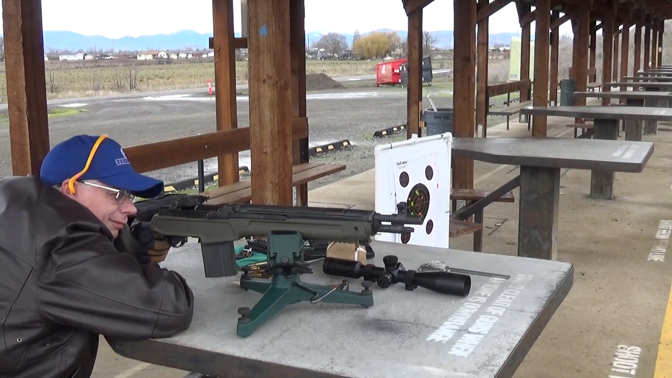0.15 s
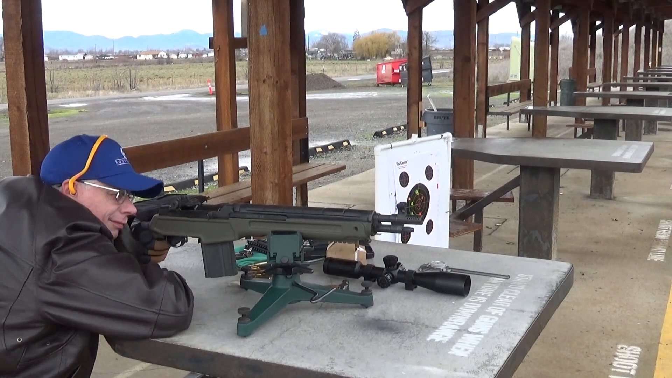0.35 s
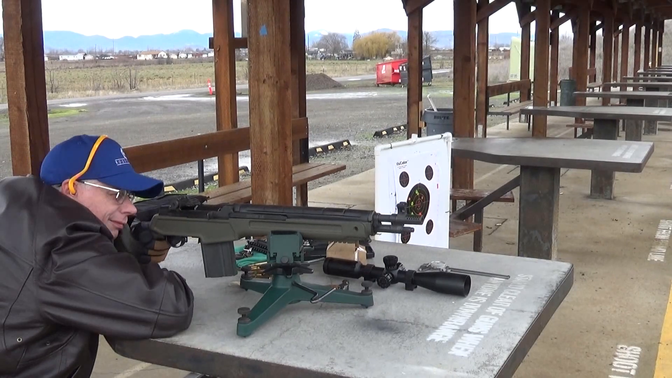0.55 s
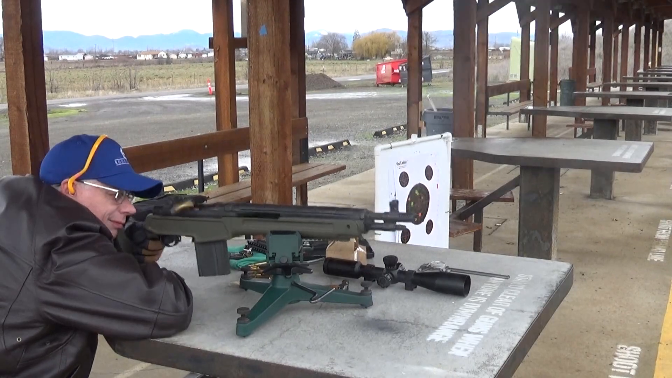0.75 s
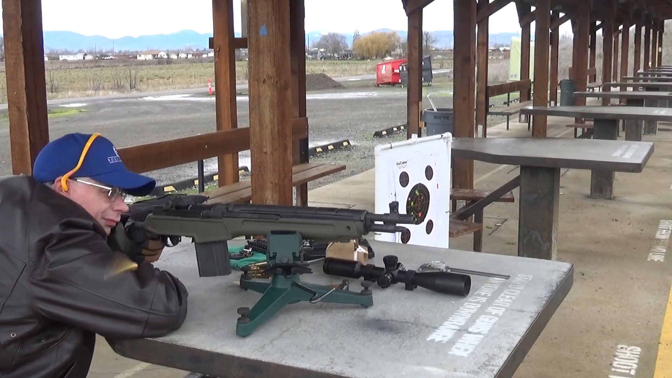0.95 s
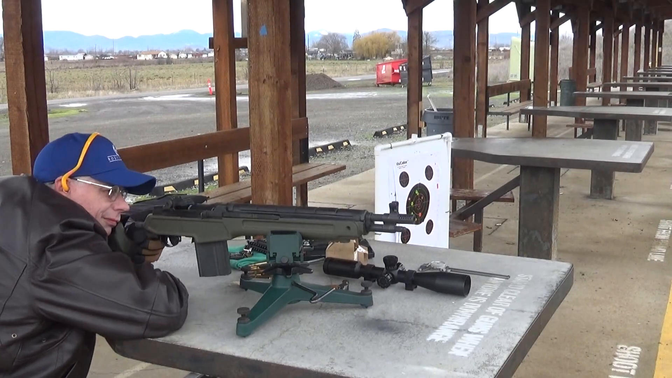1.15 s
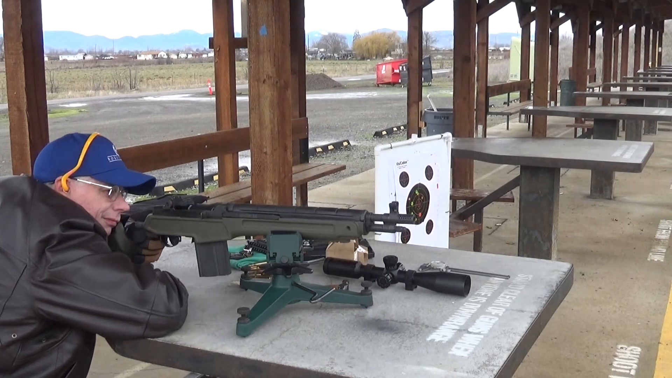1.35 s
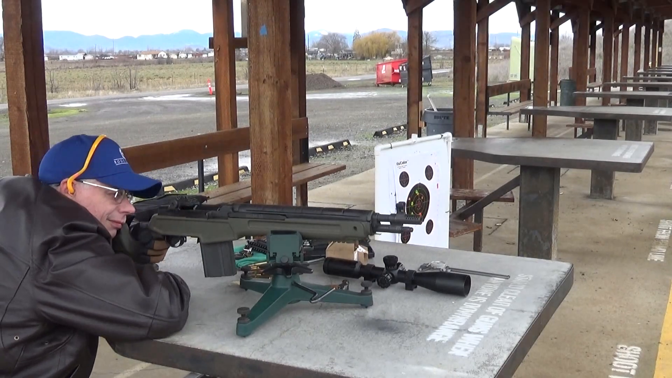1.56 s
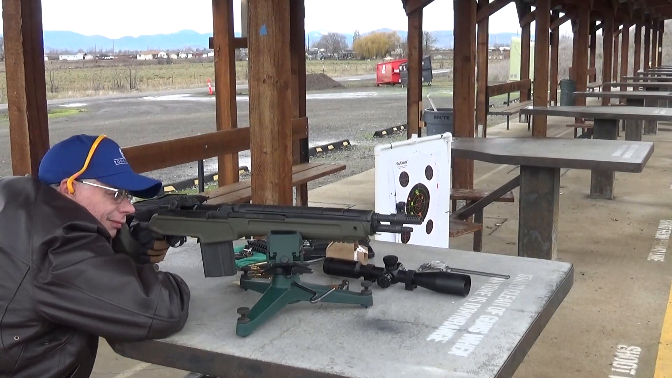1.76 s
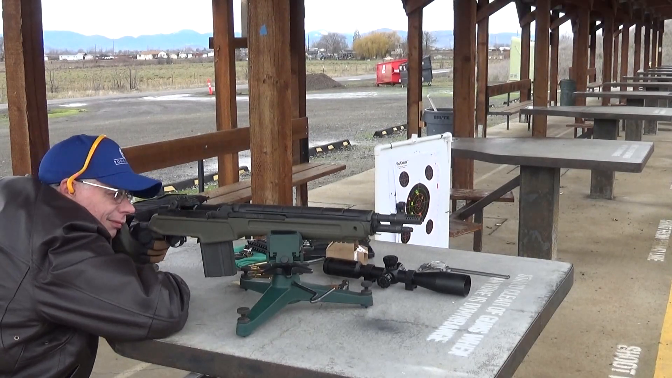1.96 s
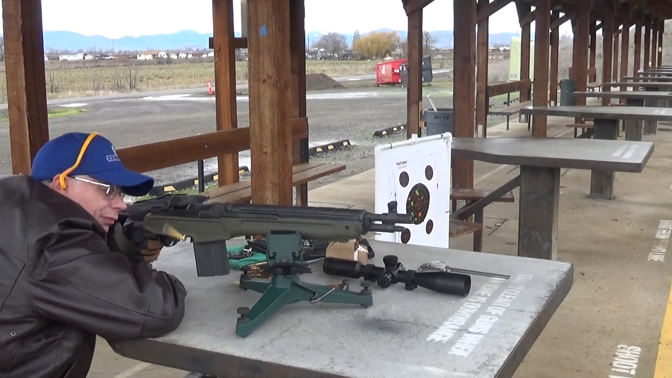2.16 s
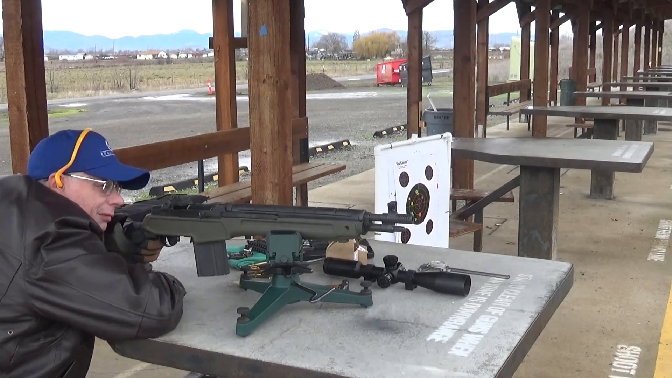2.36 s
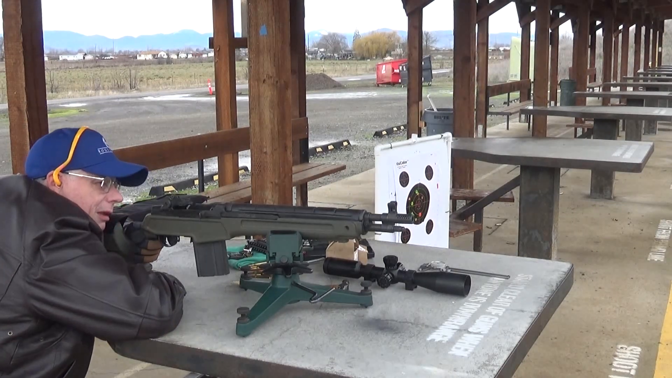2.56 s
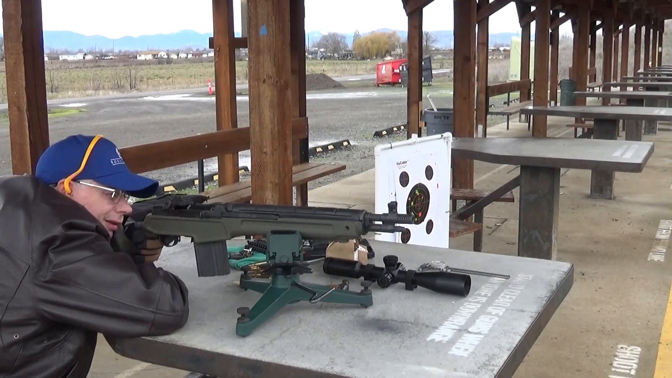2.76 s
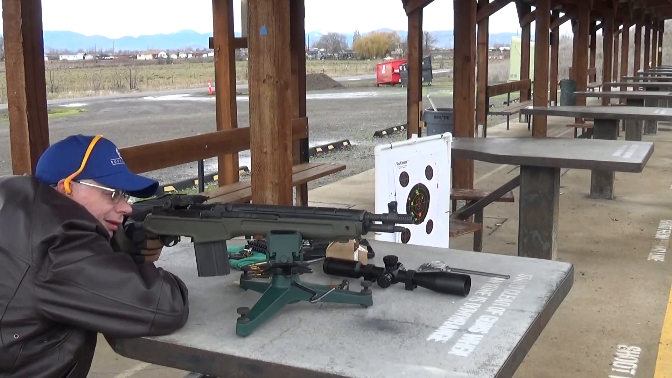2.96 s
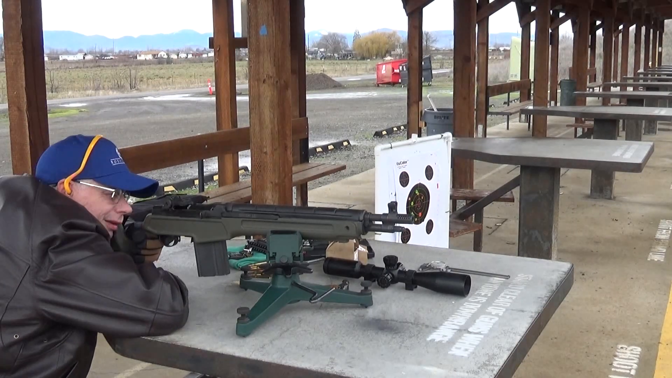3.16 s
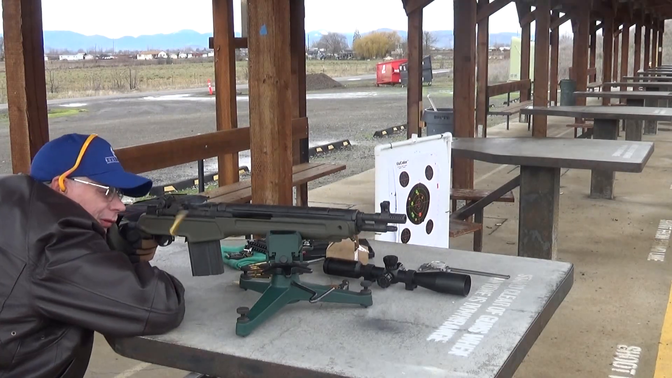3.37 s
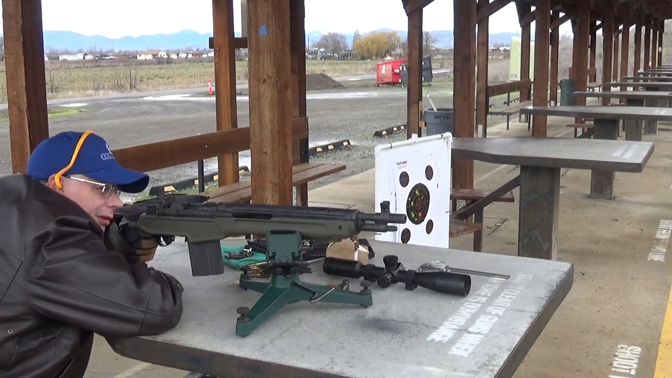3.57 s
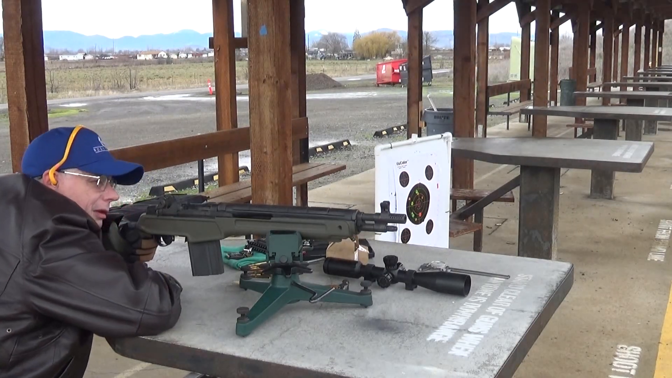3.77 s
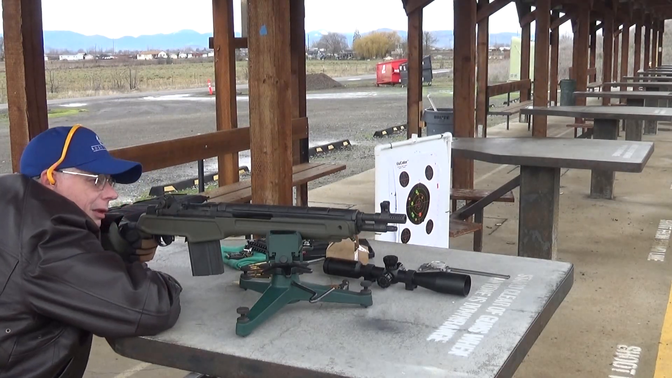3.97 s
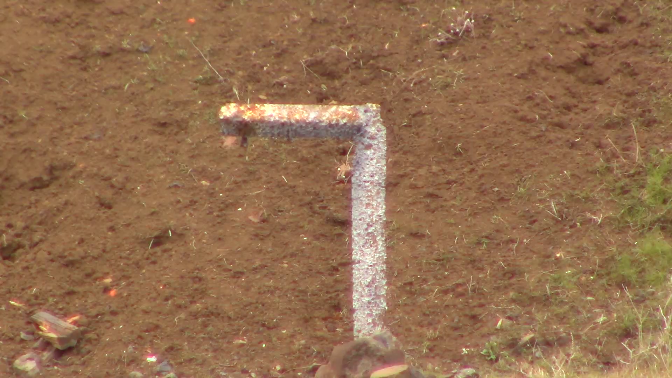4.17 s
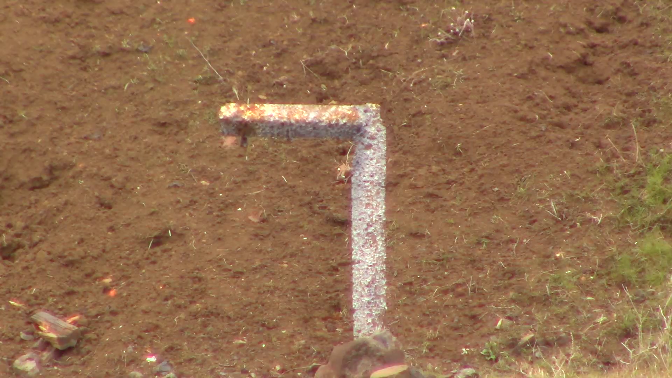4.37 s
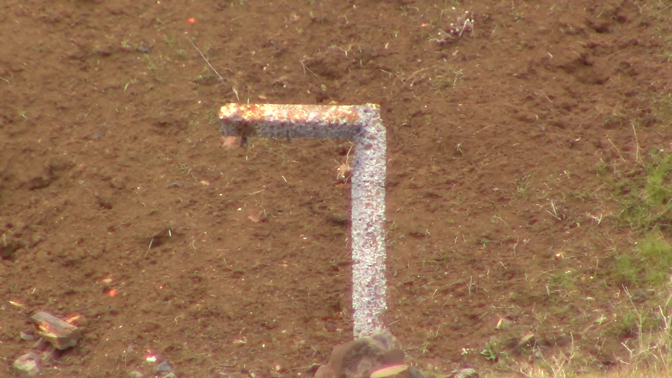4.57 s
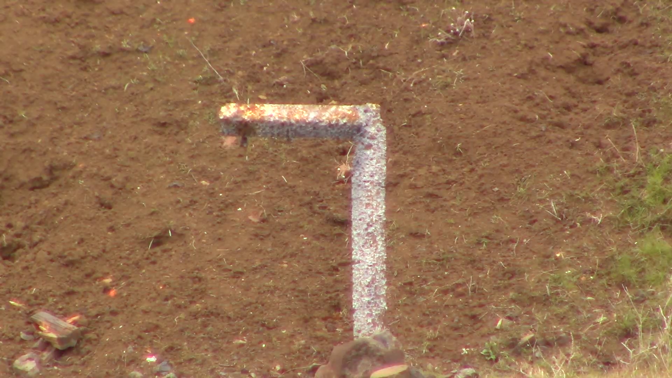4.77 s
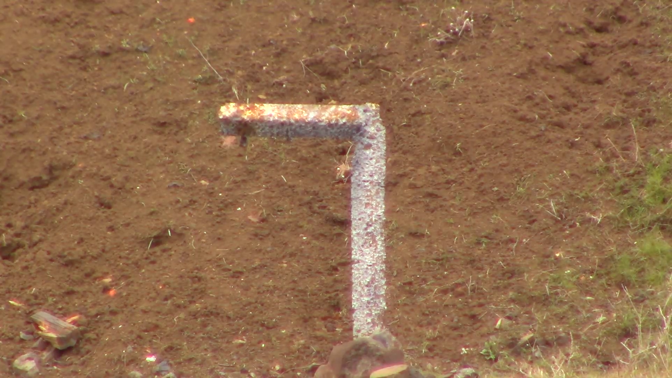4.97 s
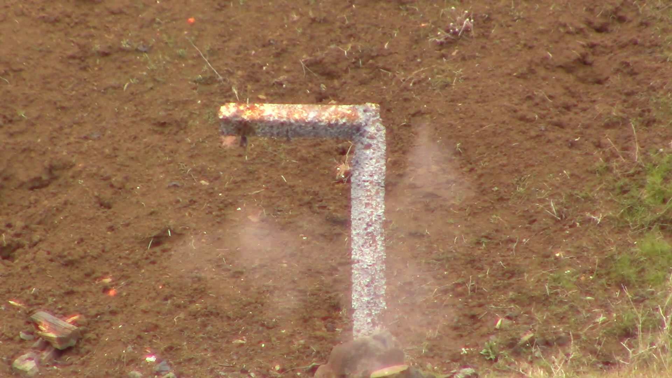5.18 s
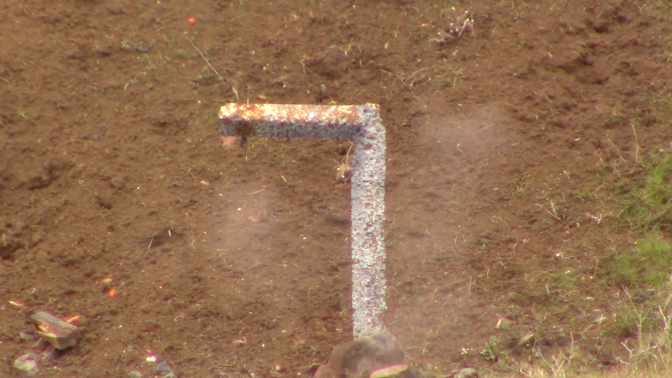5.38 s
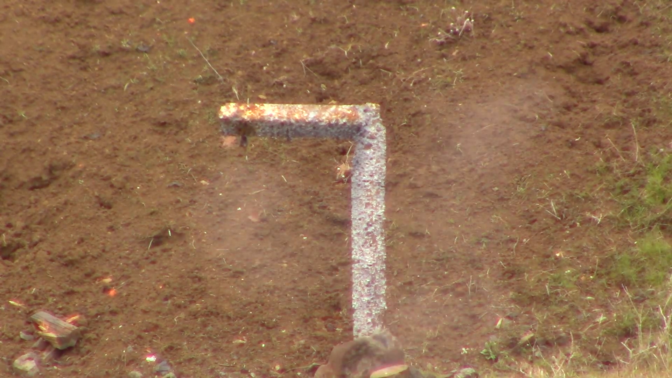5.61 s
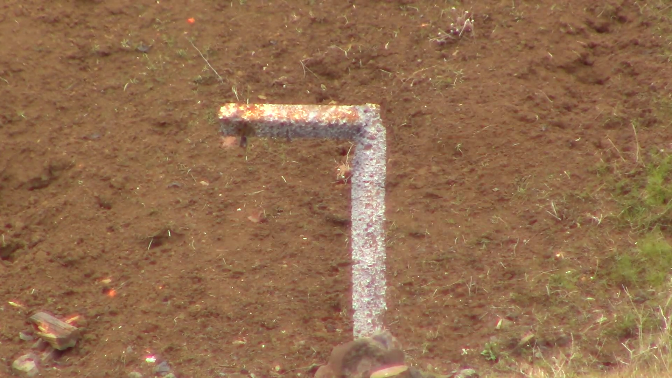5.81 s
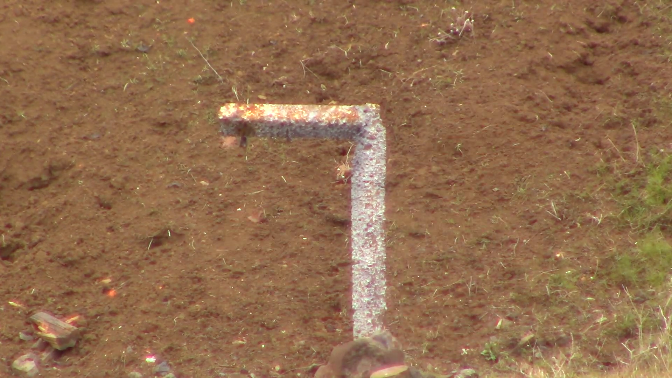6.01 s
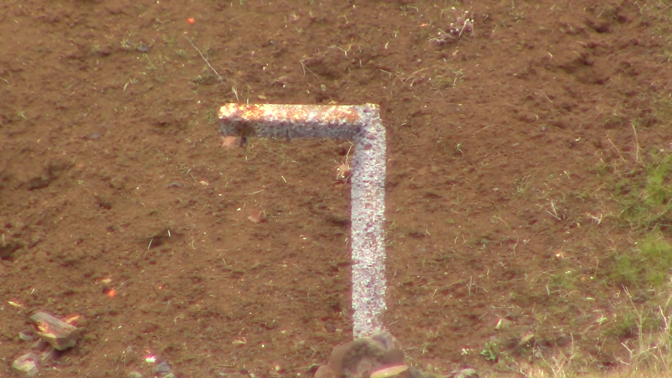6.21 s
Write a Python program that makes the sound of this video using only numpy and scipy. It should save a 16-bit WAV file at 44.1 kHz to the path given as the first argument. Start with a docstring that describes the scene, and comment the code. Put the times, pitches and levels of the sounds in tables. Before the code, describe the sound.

Low, distant traffic and wind open the scene at a covered outdoor range, with a very faint bird trill and chirp. A close rifle fires loudly at about 0.8, 2.1 and 3.3 seconds. Each shot is a sharp snap and a full blast that rolls for about half a second; the first two carry a tiny metallic ping. Brass cases land on concrete with a tick and a high, shimmering ring at 1.4, 2.6 and 3.9 seconds. The rifle knocks dully on its rest at 1.6 and 4.1 seconds. At 4.2 the sound shifts to the quieter target area. A bullet cracks sharply at 4.9 with a sizzling tail, followed at 5.1 by the distant gun's boom and its echoes. Around 5.3 the bullet thuds into the bank, and grit and clods patter briefly. Soft outdoor background swells back near 6 seconds.

```python
"""At an outdoor range, a self-loading rifle fires three shots from a bench under a timber roof.
Each blast rolls along the posts and earth banks, then the empty brass case lands and rings as it spins.
A fourth shot is heard from beside the target: first the crack of a bullet flying faster than sound,
then the far boom of the gun and flying earth, before the outdoor background swells back.
Far traffic and wind lie underneath, and faint birds sing until the first shot."""
import sys
import numpy as np
from scipy import signal
from scipy.fft import rfft, irfft
from scipy.io import wavfile

SR = 44100
rng = np.random.default_rng(int(sys.argv[2]) if len(sys.argv) > 2 else 0)


def dump_mix(stems):
    """Bounce the given channels to the path in sys.argv[1] as a 16-bit WAV at rate SR."""
    frames = np.atleast_2d(stems).T  # one column per channel
    limited = np.clip(frames, -1, 1)  # hard clip at full scale
    pcm = np.round(limited * 32767).astype(np.int16)
    wavfile.write(sys.argv[1], SR, pcm)


N = 275625

# Shots at the bench and when each one's tail stops: start_s, level_db, cut_s
SHOTS = [(0.789, -1, 1.592), (2.0819, -1.06, 2.796), (3.326, -1, 4.178)]
# The bolt pings as the rifle throws the case out: start_s, level_db
EJECT_PINGS = [(.859, -7.5), (2.139, -12), (3.39, -30)]
def bench_shots():
    """A short snap, the blast, then a ping. Rifle and range stay put, so every shot echoes alike."""
    out, blast = np.zeros((2, N)), rolling_blast()
    for start_s, level_db, _ in SHOTS:
        snap = noise(BLAST_TONE, UNDER_ROOF, size=512) * dying(0.015, size=512)
        add(out, from_db(level_db - 7.5) * high_pass(snap, 1200), start_s - .0063)
        add(out, from_db(level_db) * blast, start_s)
    for start_s, level_db in EJECT_PINGS:
        add(out, from_db(level_db) * ping(10500, fade_s=0.044), start_s)
    return round_peaks(out, top=.95)


# Tone of the low boom, middle roar, near and far scattered echoes, and bright blast: pitch_hz, level_db
BOOM_TONE = [(60, -35.5), (100, -22), (128, -2.5), (200, -1.5), (280, 0.5), (400, -1), (520, -7.5),
             (900, -41.5)]
ROAR_TONE = [(250, -39.5), (450, -2), (640, 2.5), (900, 0.5), (1250, -5), (1800, -9.5), (4000, -27.5)]
SCATTER_TONE = [(400, -30), (1000, 3.5), (2000, 2), (3500, 0.5), (5000, -1), (7000, -4.5), (10000, -18),
                (13000, -34.5), (16000, -57.5)]
FAR_SCATTER_TONE = [(400, -21.5), (1000, -4), (2200, 2), (3600, 1), (4800, -2), (6500, -9.5), (9000, -16.5),
                    (11000, -26.5), (13500, -39), (16000, -56)]
BLAST_TONE = [(100, -0.5), (700, 3.5), (1500, -1.5), (3000, 6), (6500, 0.5), (10000, 4.5), (13000, -5),
              (16000, -17.5)]
# Pitches that the shelter makes louder or softer: pitch_hz, width_hz, boost_db
SHELTER_NOTES = [(131, 16, 3), (168, 14, 3), (203, 16, 4), (232, 16, -4), (262, 24, 2), (303, 12, 3),
                 (480, 30, -4), (512, 16, 4), (560, 40, -4), (613, 24, 4), (640, 14, 3), (726, 14, 3),
                 (863, 18, 3), (940, 18, 3.5)]
def rolling_blast(size=44100):
    """The blast, then a crowd of echoes from roof, posts and banks; the low ones arrive last."""
    t = seconds(size)
    boom, roar, scatter = echo_loudness(t)
    scatter = scatter * flutter(depth_db=1.4, per_s=160, size=size)   # single posts stand out
    far = np.clip((t - .3) / 0.071, 0, 1)   # the air takes the treble from late echoes
    layers = [(boom, BOOM_TONE), (roar, ROAR_TONE),
              (scatter * np.sqrt(1 - far), SCATTER_TONE), (scatter * np.sqrt(far), FAR_SCATTER_TONE)]
    roll = sum(gain * out_of_step(noise(tone, UNDER_ROOF, size, SHELTER_NOTES)) for gain, tone in layers)
    roll *= 1 - np.exp(-t / 0.0026)   # the echoes take a moment to gather
    bright = from_db(-8) * dying(0.04, size) + from_db(-10.5) * dying(0.44, size)
    bright += from_db(-30) * swell(t, 0.33, 0.07)   # a bright echo from down the range
    gas_push = from_db(-22.5) * sine(92, t) * swell(t, 0.053, 0.023)
    return from_db(1.53) * roll + bright * noise(BLAST_TONE, UNDER_ROOF, size) + gas_push


# Surfaces that throw each shot back: delay_s, half_length_s, boom_db, roar_db, scatter_db
RANGE_ECHOES = [(0.056, 0.031, -23.5, -11.5, -25), (.29, 0.05, -12, -17, -59), (.83, .06, -33, -55, -32.5)]
def echo_loudness(t):
    """Boom and roar build, hold and fade over a faint rumble; the high scatter fades from the start."""
    boom = from_db(-14) * rise_and_fall(t, rise_s=0.048, hold_s=0.34, fall_db_per_s=102.5)
    roar = from_db(-12.5) * rise_and_fall(t, rise_s=0.015, hold_s=0.23, fall_db_per_s=130)
    scatter = from_db(-10.5 - 35 * t)
    rumble = rise_and_fall(t, rise_s=0.048, hold_s=0, fall_db_per_s=19.5)
    direct = [np.hypot(boom, from_db(-23) * rumble), np.hypot(roar, from_db(-36) * rumble), scatter]
    return with_echoes(direct, RANGE_ECHOES, t)


# How far the left side runs ahead of the right: pitch_hz, lead_radians
LEFT_LEAD = [(30, 0), (150, -.55), (430, -0.77), (1120, -0.25), (3620, 0.1), (16000, 0)]
# How much louder the left side is: pitch_hz, left_minus_right_db
LEFT_BALANCE = [(60, .5), (200, -1.5), (700, -1.6), (1800, -2.5), (4400, -1.5), (15000, 0.5)]
def out_of_step(x):
    """The echoes differ a little in timing and loudness between left and right."""
    size = x.shape[-1]
    hz, half_each = pitches(size), np.array([[.5], [-.5]])
    shift = np.exp(1j * half_each * at_hz(LEFT_LEAD, hz))
    balance = from_db(half_each * at_hz(LEFT_BALANCE, hz))
    return irfft(rfft(x) * shift * balance, size)


# Tone of the crack's sizzle, and of the low and high parts of the far boom: pitch_hz, level_db
SIZZLE_TONE = [(200, -31), (500, -19), (1000, -8), (2000, 0.5), (3500, 2.5), (6000, -3.5), (9000, -8),
               (11000, -20), (15000, -35)]
FAR_BOOM_LOW = [(100, -19), (160, -22), (220, -6), (310, -3), (420, 0), (520, -5.5), (630, -7.5),
                (850, -14), (1500, -70)]
FAR_BOOM_HIGH = [(500, -38), (900, -1), (1400, 6), (2200, 4.5), (3400, 0.5), (5000, -12), (8000, -25),
                 (12000, -74)]
# Echoes of the far boom: peak_s, half_length_s, low_db, high_db
FAR_ECHOES = [(5.457, 0.11, -38, -25.5), (5.693, 0.12, -37, -31), (5.749, 0.0074, -28.5, -28.5),
              (5.85, 0.12, -46, -33.5)]
CRACK_S, FAR_BOOM_S, TARGET_CUT_S = 4.9257, 5.0628, 5.868
def incoming_shot():
    """The bullet outruns sound, so its crack sizzles off the ground before the gun's boom arrives."""
    t = seconds(N)
    hiss = rise_and_fall(t - CRACK_S, rise_s=0.0027, hold_s=0.072, fall_db_per_s=47)
    ground_echo = swell(t, CRACK_S + 0.061, 0.048) * (t > CRACK_S)
    sizzle = from_db(-13.5) * np.hypot(hiss, ground_echo)
    tail = rise_and_fall(t - FAR_BOOM_S, rise_s=0.0025, hold_s=0, fall_db_per_s=101)
    low, high = with_echoes([from_db(-6.5) * tail, from_db(-8.5) * tail], FAR_ECHOES, t)
    out = sizzle * noise(SIZZLE_TONE, UNDER_ROOF) + low * noise(FAR_BOOM_LOW, IN_THE_OPEN)
    out += high * flutter(depth_db=1, per_s=170) * noise(FAR_BOOM_HIGH, IN_THE_OPEN)
    add(out, from_db(10.5) * high_pass(click(3600, fade_s=.04), 250), CRACK_S)
    add(out, from_db(18.5) * thump(370, half_length_s=.005), FAR_BOOM_S)
    add(out, from_db(7) * low_pass(click(1400, fade_s=0.014), 2800, order=4), FAR_BOOM_S)
    add(out, from_db(-9) * thump(480, half_length_s=0.0039), 5.234)   # the boom bounces off a bank
    return out * np.interp(t, [TARGET_CUT_S - .003, TARGET_CUT_S], [1, 0])


# Sprays of earth: peak_s, level_db, half_length_s
EARTH_SPRAYS = [(5.358, -8, 0.014), (5.389, -11, 0.016), (5.428, -11.5, 0.0047), (5.444, -13.5, 0.017),
                (5.499, -14, 0.0054), (5.51, -16, 0.0068), (5.542, -18.5, 0.0032), (5.569, -27, 0.0027),
                (5.616, -19.5, .0026)]
def flying_earth(strike_s=5.327, dulling_s=0.03, size=4096):
    """The bullet thuds into the bank; fine, bright grit flies first and dull clods follow."""
    out, t = np.zeros((2, N)), seconds(size) - size / 2 / SR
    add(out, from_db(-2) * click(4800, fade_s=0.0079), strike_s)
    thud = (strike_s + 0.00201, -7, .0032, 0)   # a spray with no grit in it
    sprays = [(peak_s, level_db, half_length_s, np.exp((EARTH_SPRAYS[0][0] - peak_s) / dulling_s))
              for peak_s, level_db, half_length_s in EARTH_SPRAYS]
    for peak_s, level_db, half_length_s, grit in [thud] + sprays:
        pitch_hz = np.interp(grit, [0, 1], [1640, 3430])
        treble_db = np.interp(grit, [0, 1], [-21.5, -18.5])
        spray = noise(hump(pitch_hz, below_db=-22.5, above_db=treble_db), IN_THE_OPEN, size)
        grains = flutter(depth_db=1.8, per_s=700, size=size)
        add(out, from_db(level_db) * spray * grains * swell(t, 0, half_length_s), peak_s + t[0])
    return low_pass(out, 10000, order=6)


# Brass cases landing: start_s, tick_db, tick_hz, clink_db, ring_db, lowest_note_hz
CASE_LANDINGS = [(1.4025, 3, 6360, -48, -16, 9570), (2.6167, -6.5, 4000, -11, -14, 9530),
                 (2.628, 0.5, 5640, -42, -37, 9640), (3.8871, -2, 4400, -21, -32, 9630),
                 (3.8974, -8.5, 3000, -20.5, -19, 9650)]
def falling_cases():
    """Each landing is a sharp tick, a brief clink of the bench top and a high ring."""
    out, clink = np.zeros((2, N)), ping(1720, fade_s=.025)
    for start_s, tick_db, tick_hz, clink_db, ring_db, lowest_note_hz in CASE_LANDINGS:
        roof_echo = from_db(-26) * click(tick_hz, fade_s=0.12)
        add(out, from_db(tick_db) * (tick(tick_hz) + roof_echo) + from_db(clink_db) * clink, start_s)
        add(out, from_db(ring_db) * spinning_ring(lowest_note_hz), start_s)
    return out


def tick(hz, size=4096):
    """Metal meets concrete: one sharp spike of height 1."""
    band_hz = [hz / 1.47, min(hz * 1.6, .45 * SR)]
    band_filter = signal.butter(2, band_hz, "band", fs=SR, output="sos")
    spike = signal.sosfilt(band_filter, signal.unit_impulse(size))
    return spike / np.abs(spike).max()


# The notes of a brass case, retuned for each landing: pitch_hz, level_db, fade_s
BRASS_NOTES = [(9560, -1, 0.31), (12520, -6, 0.27), (14700, -5.5, 0.29)]
def spinning_ring(lowest_note_hz, spread_hz=75, count=14, size=16384):
    """Spin and nearby echoes split each note into close pitches that shimmer together."""
    out, t = 0, seconds(size)
    for pitch_hz, level_db, fade_s in BRASS_NOTES:
        note_hz = pitch_hz * lowest_note_hz / BRASS_NOTES[0][0]
        close_hz = note_hz + spread_hz * rng.standard_normal((count, 1))
        phase = 2 * np.pi * rng.random((count, 1)) + 0.18 * rng.standard_normal((2, count, 1))
        shimmer = np.sin(2 * np.pi * close_hz * t + phase).sum(axis=1)
        out = out + from_db(level_db) * rms_one(shimmer) * dying(fade_s, size)
    return out * (1 - 0.4 * np.exp(-t / 0.009))   # the ring grows as the echoes join in


# The rifle knocks on its rest: start_s, click_db, thump_db
RIFLE_KNOCKS = [(1.578, -23, -45), (1.587, -23, 0), (4.112, -27.5, -45), (4.1232, -23.5, -7)]
def rifle_knocks():
    """The rifle settles on its rest with a click and a dull thump."""
    out = np.zeros((2, N))
    for start_s, click_db, thump_db in RIFLE_KNOCKS:
        add(out, from_db(click_db) * low_pass(click(4300, fade_s=0.029), 9100, order=4), start_s)
        add(out, from_db(thump_db - 7) * thump(200, half_length_s=0.0065), start_s + 0.0039)
    return out


# Tone of the background as it comes back: pitch_hz, level_db
RETURNING_AIR_TONE = [(100, -34.5), (230, -29), (400, -13), (640, -0.5), (1100, -6), (1500, -11.5),
                      (1900, -12), (3200, -20), (5000, -38), (10000, -48)]
def returning_background(start_s=5.73, rise_s=0.27):
    """The outdoor background swells back after the last shot and stays, wavering slightly."""
    rise = np.clip((seconds(N) - start_s) / rise_s, 0, 1)
    return from_db(-34) * rise * noise(RETURNING_AIR_TONE, IN_THE_OPEN) * flutter(depth_db=1.3, per_s=90)


# Tone of the background at the bench and at the target: pitch_hz, level_db
BENCH_AIR_TONE = [(25, -11), (50, -5.5), (80, 0.5), (125, 0.5), (200, -7), (350, -12.5), (600, -10),
                  (950, -8.5), (1500, -19), (2100, -29), (3500, -36.5), (8000, -40.5), (15000, -44)]
TARGET_AIR_TONE = [(30, -27), (70, -13), (130, -12), (240, -0.5), (450, -3), (800, -0.5), (1300, -4.5),
                   (1900, -17.5), (4500, -21.5), (10000, -31), (15000, -44)]
# How alike its left and right sides are at each spot: pitch_hz, likeness_0_to_1
BENCH_LIKENESS = [(60, 1.0), (130, 1.0), (290, 0.98), (640, 0.88), (1410, 0.68), (3100, 0.54), (6820, 0.77),
                  (15000, 0.99)]
TARGET_LIKENESS = [(60, .3), (200, .94), (700, 0.77), (1300, 0.51), (2400, .1), (8000, 0.3)]
def traffic_and_wind():
    """Far traffic and wind, at the bench and then at the target, dip while a shot sounds."""
    t, move_s = seconds(N), SHOTS[-1][2]
    at_target = np.interp(t, [move_s - .005, move_s], [0, 1])
    incoming = switch_on(CRACK_S - .022, CRACK_S - .016, TARGET_CUT_S)
    bench = from_db(-34 - 5.5 * during_bench_shots()) * noise(BENCH_AIR_TONE, BENCH_LIKENESS)
    bench *= flutter(depth_db=0.15, per_s=12)
    target = from_db(-43.5 - 12 * incoming) * noise(TARGET_AIR_TONE, TARGET_LIKENESS)
    return (1 - at_target) * bench + at_target * target


def birds():
    """A far, fast trill and one falling chirp, hushed by the first shot."""
    t = seconds(N)
    trill_tone = [(2300, -29), (2720, -3), (3000, -16.5), (3300, -19), (3500, -9.5), (3800, -35)]
    trill = from_db(-53.5) * noise(trill_tone, IN_THE_OPEN) * sine(15, t) ** 4   # 30 pulses a second
    chirp_hz = np.interp(t, [.5, .56], [3000, 2550]) * (1 + .04 * sine(220, t))
    chirp = from_db(-51) * np.sin(2 * np.pi * np.cumsum(chirp_hz) / SR) * swell(t, .525, 0.031)
    return (trill + chirp) * (t < SHOTS[0][0])


# How alike left and right sound under a roof and in the open: pitch_hz, likeness_0_to_1
UNDER_ROOF = [(60, .8), (130, .82), (300, 0.85), (1400, 0.69), (7000, 0.76), (15000, .94)]
IN_THE_OPEN = [(60, 1), (300, 1), (2000, 0.92), (10000, 0.8)]
def noise(tone, likeness, size=N, notes=()):
    """Stereo noise of average strength 1, shaped by a tone table and fading beyond its ends."""
    hz = pitches(size)
    boosts_db = sum(db / (1 + (2 * (hz - note_hz) / width_hz) ** 2) for note_hz, width_hz, db in notes)
    edges = np.minimum(hz / tone[0][0], 1) ** 2 * np.minimum(tone[-1][0] / hz, 1) ** 2
    gain = from_db(at_hz(tone, hz) + boosts_db) * edges
    shared, opposite = gain * np.exp(2j * np.pi * rng.random((2, len(hz))))
    alike = np.clip(at_hz(likeness, hz), 0, 1)
    return rms_one(irfft(np.sqrt(1 + alike) * shared + np.sqrt(1 - alike) * opposite * [[1], [-1]], size))


def hump(centre_hz, below_db, above_db):
    """A tone table with one broad peak, set by its level two octaves to each side."""
    return [(centre_hz * 2. ** k, (below_db if k < 0 else above_db) * (abs(k) / 2) ** 1.6)
            for k in range(-3, 4)]


def click(centre_hz, fade_s, size=4096):
    """A hard hit: a burst of noise that dies quickly."""
    return noise(hump(centre_hz, below_db=-13.5, above_db=-25), IN_THE_OPEN, size) * dying(fade_s, size)


def thump(hz, half_length_s, size=4096):
    """A push of air that swings about twice."""
    t = seconds(size)
    return sine(hz, t) * np.exp(-(t / half_length_s) ** 4)


def ping(hz, fade_s, size=4096):
    return sine(hz, seconds(size)) * dying(fade_s, size)


def dying(fade_s, size):
    """Falls by 60 dB in fade_s."""
    return from_db(-60 * seconds(size) / fade_s)


def swell(t, peak_s, half_length_s):
    return np.exp(-((t - peak_s) / half_length_s) ** 2)


def rise_and_fall(t, rise_s, hold_s, fall_db_per_s):
    """Rises from t = 0 and falls steadily once t passes hold_s."""
    return np.clip(t / rise_s, 0, 1) * from_db(-fall_db_per_s * np.maximum(t - hold_s, 0))


def flutter(depth_db, per_s, size=N):
    """A loudness that wanders by chance, per_s times a second."""
    steps = rng.standard_normal(4096)
    return rms_one(from_db(depth_db * np.interp(seconds(size) * per_s, np.arange(len(steps)), steps)))


def with_echoes(direct, echoes, t):
    """Adds the power of each echo to each layer's loudness curve."""
    power = np.square(direct)
    for peak_s, half_length_s, *levels_db in echoes:
        power += (from_db(levels_db)[:, None] * swell(t, peak_s, half_length_s)) ** 2
    return np.sqrt(power)


def switch_on(start_s, full_s, cut_s):
    return np.interp(seconds(N), [start_s, full_s, cut_s - .003, cut_s], [0, 1, 1, 0])


def during_bench_shots():
    """Turns on just before each bench shot and off suddenly in its tail."""
    return sum(switch_on(start_s - .03, start_s - .02, cut_s) for start_s, _, cut_s in SHOTS)


def from_db(db):
    return 10 ** (np.asarray(db) / 20)


def rms_one(x):
    return x / np.sqrt(np.mean(x ** 2) + 1e-20)


def seconds(size):
    return np.arange(size) / SR


def sine(hz, t):
    return np.sin(2 * np.pi * hz * t)


def pitches(size):
    return np.maximum(np.fft.rfftfreq(size, 1 / SR), 1)


def at_hz(table, hz):
    table_hz, values = np.array(table).T
    return np.interp(np.log(hz), np.log(table_hz), values)


def add(out, x, start_s):
    start = round(start_s * SR)
    out[:, start:start + x.shape[-1]] += x[..., :N - start]


def high_pass(x, hz):
    return signal.sosfilt(signal.butter(4, hz, "high", fs=SR, output="sos"), x)


def low_pass(x, hz, order):
    return signal.sosfilt(signal.butter(order, min(hz, .45 * SR), fs=SR, output="sos"), x + 1e-18)


def round_peaks(x, top):
    return top * np.tanh(x / top)


def limiter(x, threshold_db, attack_s, release_db_per_s):
    """Turns the volume down on a peak and lets it come back steadily."""
    excess_db = np.maximum(20 * np.log10(np.abs(x).max(axis=0) + 1e-9) - threshold_db, 0)
    recovery_db = release_db_per_s * seconds(N)
    held_db = np.maximum.accumulate(excess_db + recovery_db) - recovery_db
    smoothing = np.exp(-1 / (attack_s * SR))
    return x * from_db(-signal.lfilter([1 - smoothing], [1, -smoothing], held_db))


def scene():
    """Three shots at the bench, then one heard at the target, over the outdoor background."""
    at_bench = (bench_shots() + falling_cases() + rifle_knocks()) * during_bench_shots()
    lean_left = from_db([[0.55], [-0.55]])
    at_target = high_pass(incoming_shot() + flying_earth(), 152) * lean_left
    return at_bench + at_target + traffic_and_wind() + returning_background() + birds()


def record(dry):
    """The volume dips after the crack and far boom, peaks are rounded and the highest treble is cut."""
    limited = limiter(dry, threshold_db=5.5, attack_s=0.00053, release_db_per_s=301.5)
    treble_cut = signal.cheby2(18, 85, 16900, fs=SR, output="sos")
    return signal.sosfilt(treble_cut, round_peaks(limited, top=1.1))


dry = scene()
out = record(dry)
dump_mix(out)
```